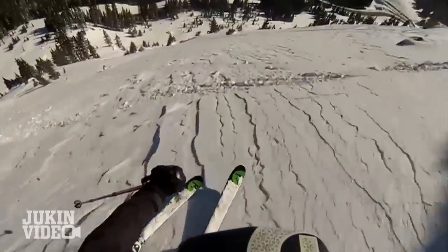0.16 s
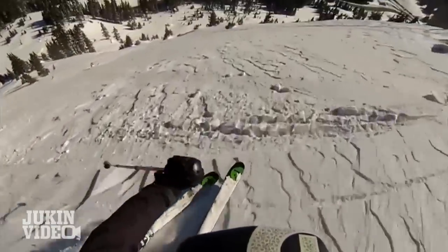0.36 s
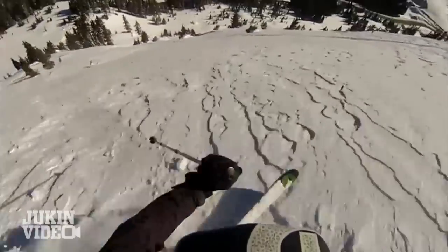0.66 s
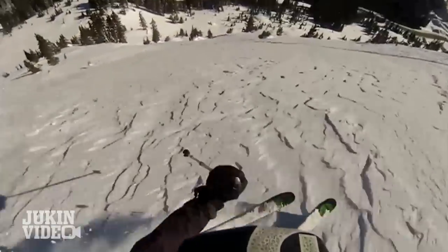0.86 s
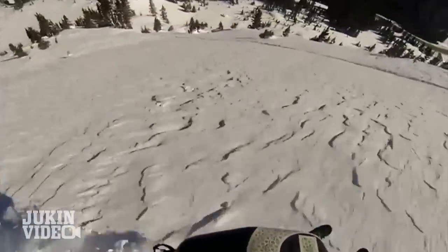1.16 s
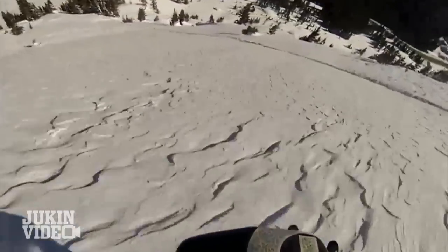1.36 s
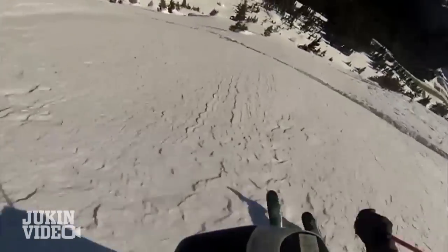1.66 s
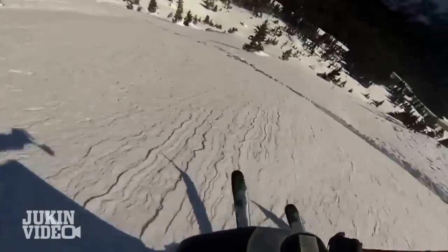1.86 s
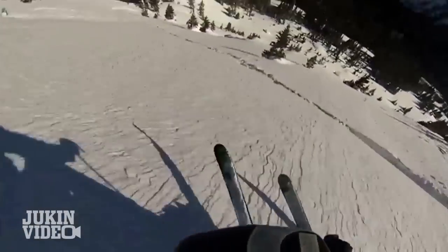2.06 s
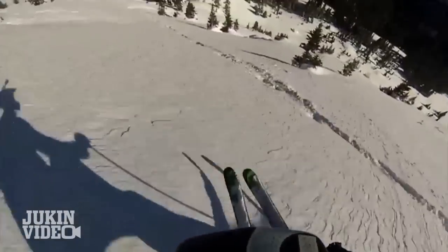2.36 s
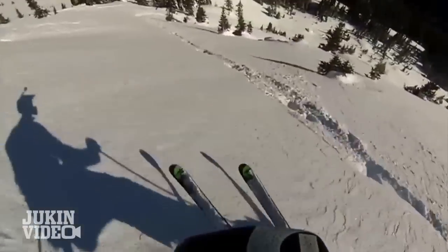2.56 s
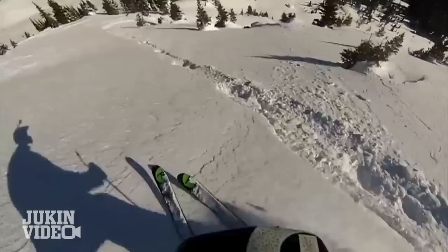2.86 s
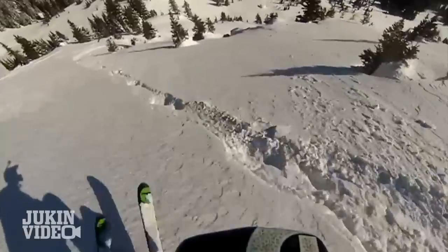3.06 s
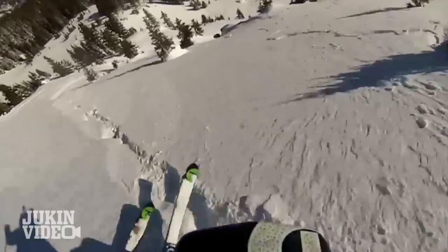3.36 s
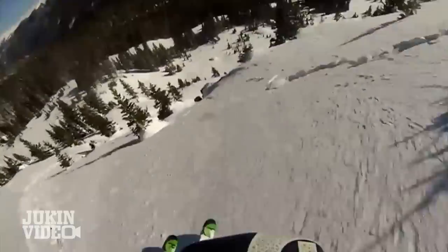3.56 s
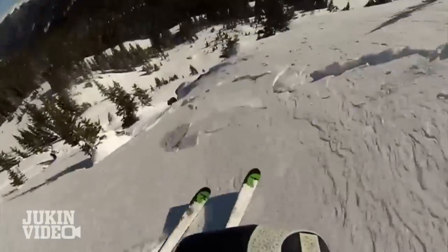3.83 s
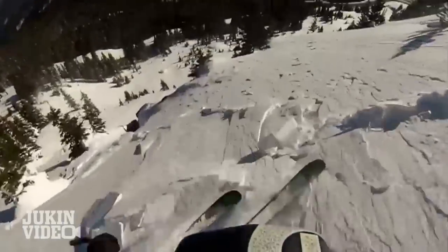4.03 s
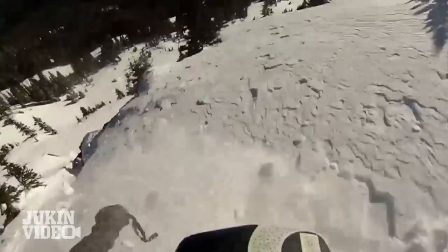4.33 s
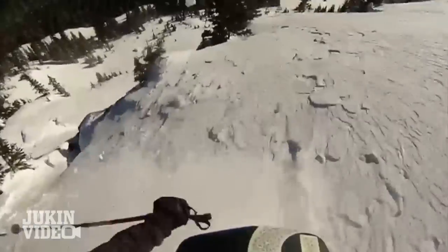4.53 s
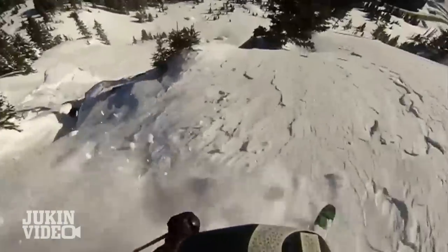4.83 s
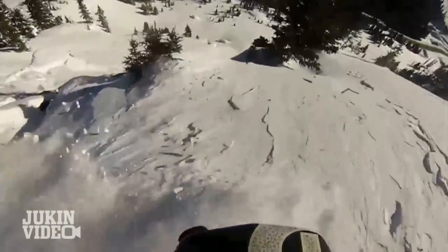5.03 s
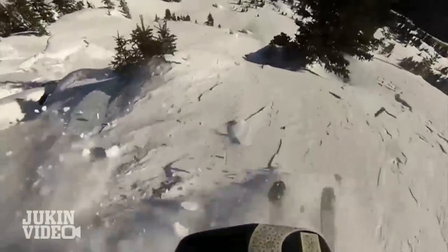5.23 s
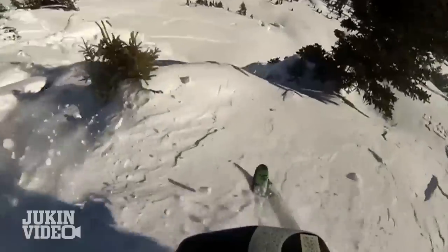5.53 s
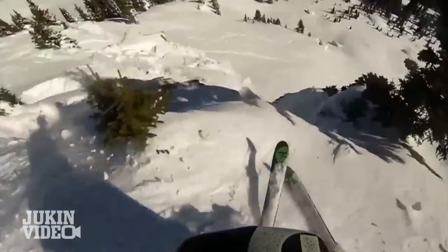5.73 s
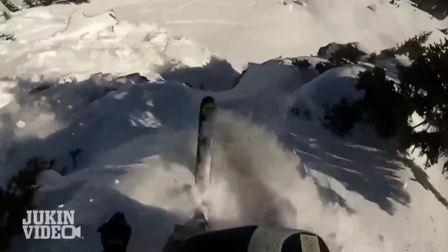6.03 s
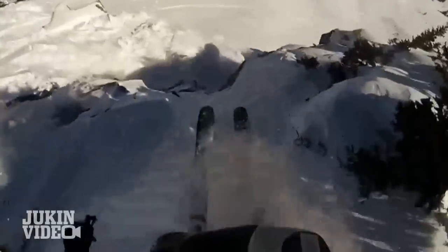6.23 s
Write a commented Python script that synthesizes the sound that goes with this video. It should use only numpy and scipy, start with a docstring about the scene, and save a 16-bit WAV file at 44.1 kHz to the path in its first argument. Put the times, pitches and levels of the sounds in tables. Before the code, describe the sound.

Skis scrape over hard snow under buffeting wind, until the rumble swells and crackles and the skis clack loudly against snow blocks.

```python
"""Skis hiss over wind-packed snow while rushing air rumbles and drones right at the microphone.
It rides a fast run in a closed case on the skier's helmet, a body's height above the skis.
Air buffets the case and keeps its mount ringing; bumps jolt it. Then the slab breaks up: the rumble
swells and crackles, and the skis knock on blocks of snow and on each other."""
import sys
import numpy as np
from scipy import signal
from scipy.fft import rfft, irfft, next_fast_len
from scipy.io import wavfile
from scipy.ndimage import uniform_filter1d, minimum_filter1d

SR = 44100
rng = np.random.default_rng(int(sys.argv[2]) if len(sys.argv) > 2 else 0)


def master(y):
    """Save y as 16-bit WAV."""
    cut = np.clip(np.atleast_2d(y).T, -1, 1)
    pcm = np.round(cut * 32767)  # scale
    wavfile.write(sys.argv[1], SR, pcm.astype(np.int16))


N = 281799
TIME = np.arange(N) / SR
CRUISE_DB = -41.5   # air force and edge bite in an easy glide; the layers follow their swing around it

# force of the air on the helmet (time [s], level [dB])
AIR_FORCE = [(0, -47), (0.85, -41.5), (1.1, -48), (1.9, -42.0), (3.1, -46.5), (3.65, -36), (4.3, -34.5),
             (4.55, -45.5), (4.95, -47.5), (5.42, -50.5), (5.72, -35.5), (5.88, -54.5), (6.03, -37.5),
             (6.2, -53.4), (6.37, -46.5)]
# how hard the edges bite through the turns (time [s], level [dB])
EDGE_BITE = [(0, -35.8), (0.33, -34.5), (0.92, -39.7), (1.0, -41.5), (1.35, -43.5), (1.5, -40.5),
             (1.95, -40), (2.3, -43.5), (2.85, -42), (3.2, -45), (3.42, -41.5), (3.53, -53), (3.72, -43.5),
             (3.82, -51.5), (3.95, -44), (4.12, -41.5), (4.42, -56.5), (4.8, -50.0), (5.08, -56),
             (5.6, -58.5), (6.37, -51)]
# drone of the mount, right at the microphone (time [s], level [dB])
MOUNT_DRONE = [(0, -38.5), (.33, -28.5), (.48, -33), (.68, -31), (1.0, -38), (1.75, -34.5), (2.4, -39),
               (3.25, -43.5), (3.68, -35), (4.1, -36.5), (4.6, -42), (5.5, -48), (6.0, -39), (6.37, -45)]

# spectra as heard inside the case (frequency [Hz], relative level [dB])
HISS_SPECTRUM = [(300, 0), (1500, 1), (4000, 7), (7000, 5), (8300, 1.5), (10200, 0), (11200, 4),
                 (13000, -2.5), (15200, -4)]   # steady high hiss
BUFFET_SPECTRUM = [(5, 5.5), (13, 10.5), (20, 12.5), (27, 4.5), (35, -2), (45, -7.5), (80, -55)]   # large eddies
TURBULENCE_SPECTRUM = [(30, -43), (48, 3), (70, 4.5), (110, 0), (170, -12.5), (230, -16.5), (330, -37),
                       (500, -24), (1200, -84)]   # small eddies
CRACKLE_SPECTRUM = [(20, -13), (130, -11), (300, 1), (600, -2), (2000, -13.5), (5000, -18.5), (11000, -28),
                    (15000, -30)]   # small snaps
THUD_SPECTRUM = [(40, -7), (130, -1.5), (280, 6), (500, -15.5), (1000, -21), (2500, -20), (6000, -38),
                 (15000, -44.5)]   # a bump landing
CRUNCH_SPECTRUM = [(150, -29), (230, 7), (300, 8.5), (380, 2), (600, 3), (820, 6), (1050, 2), (1400, -54),
                   (2500, -52)]   # crust under the bases
SCRAPE_SPECTRUM = [(700, -26.5), (1080, -12), (1220, -4.5), (1380, 1), (1620, -5.5), (1900, -4.5),
                   (2300, -6), (2650, -14.5), (3000, -17.5), (3270, -27.5), (3650, -27.5), (5000, -33)]   # edges on the crust
SPRAY_SPECTRUM = [(2200, -17), (3050, 6), (3250, 14), (3450, 6.5), (3800, 2.5), (4200, 4), (4310, 11),
                  (4420, 2.5), (5000, 1.5), (5600, -4.5), (6800, -5.5), (8200, -14), (11000, -17.5),
                  (15000, -29)]   # thrown powder
# stereo width of the hiss (frequency [Hz], side to mid [dB])
HISS_WIDTH = [(2000, -60), (3300, -21), (5000, -22.5), (8000, -8.5), (12000, -11)]

# resonances (frequency [Hz], width [Hz], relative gain [dB])
MOUNT_MODES = [(147, 5.2, 6), (284, 18.7, -17), (457, 6.7, -22), (691, 5.9, -34.5), (831, 22, -31.5),
               (880, 14, -33)]   # the mount: its drone first, then the overtones
SHELL_MODES = [(277, 28.5, 11.5), (470, 71, 0.5), (687, 23, 1.5), (764, 66, 5.5), (825, 210, 5.5),
               (1393, 81, -14)]   # the hollow helmet shell
KNOCK_MODES = [(750, 37, -35), (1170, 170, -1.5), (1968, 227, 8), (2180, 150, -8), (2760, 180, -8.5),
               (3110, 1270, -5.5), (4500, 290, -3.5), (5770, 126, -28), (6300, 420, -13),
               (8630, 910, -25.5), (9100, 300, -42), (9300, 470, -39), (11700, 3600, -35)]   # broad ones that every knock passes through
# thin ring of edges and poles (frequency [Hz], level re the knock [dB], t60 [s])
METAL_MODES = [(1206, -63, .3), (2420, -29, 0.1), (3100, -43, 0.27), (3720, -45, 0.2)]

# sharp little ticks (time [s], peak [dB], decay [s])
DRY_TICKS = [(3.432, -30, 0.0026), (3.6038, -43, 0.00098), (4.11, -38, 0.0057), (4.13, -37, 0.0026),
             (4.273, -38.5, 0.0028), (4.315, -27.5, 0.00175), (5.6395, -36, 0.0018), (5.7465, -30, 0.00064),
             (6.0552, -35.5, 0.003)]
# bumps that shake the helmet
# (time [s], push [dB], swing time [s], kick to the mount [dB], thud [dB], dip afterwards [dB])
BUMPS = [(0.93, -15.5, 0.0062, -28, -39, 4), (2.2, -11, 0.0056, -27, -43, 8.5),
         (3.345, -16, 0.0095, -28, -45, 2), (3.4441, -15, 0.0011, -27, -22, 15.5),
         (3.593, -15.5, 0.0076, -24.5, -36.5, 6), (3.736, -12.5, 0.0054, -33, -33.5, -0.5),
         (4.12, -17.5, 0.012, -22.5, -36, 6), (4.342, -14, 0.0047, -24, -32, 3),
         (5.756, -13.5, 0.0081, -21.5, -37.5, 10.5), (6.046, -15.5, 0.015, -33, -46, 6)]
# knocks of the skis (time [s], level over 10 ms [dB], contact [s], crumbling tail re contact [dB],
# low edge [Hz], high edge [Hz], pitch of the struck spot [Hz], its gain [dB], thud over 10 ms [dB])
SKI_KNOCKS = [(2.2031, -36.5, 0.0013, -15, 1790, 6660, 5700, -12, -67),
              (3.8626, -19.5, 0.0039, -9.5, 900, 4100, 1760, 14, -22.5),
              (3.868, -37, 0.002, -9, 706, 2430, 860, 13, -40.5),
              (4.2957, -46, 0.0051, -14, 500, 1800, 1050, 3, -32),
              (4.3103, -32, 0.0093, 3, 700, 2200, 1350, 18, -35.5),
              (4.3347, -10, 0.00426, -31, 990, 12500, 2610, -1, -23.5),
              (4.576, -41.5, 0.0054, 7, 1400, 2840, 2900, 7, -73),
              (4.6827, -49, 0.0037, -16, 1200, 2200, 1460, 18, -67),
              (4.9490, -26, 0.0077, -0.5, 1500, 5040, 1780, 18, -44),
              (5.598, -25, 0.0038, 10, 1180, 2690, 1450, 9, -40),
              (5.601, -49, 0.0019, -11, 4500, 7000, 4630, 9, -62),
              (5.625, -44, .008, 1, 1500, 3000, 2090, -4, -51),
              (5.8448, -40, 0.0065, 1, 1190, 2330, 2000, -25, -61)]


def from_db(db):
    """Decibels to gain."""
    return 10 ** (np.asarray(db) / 20)


def rms_one(x):
    """Scale to an rms of 1."""
    return x / np.sqrt(np.mean(x ** 2) + 1e-20)


def burst(x, db):
    """Scale a short sound to the energy of 10 ms at this level."""
    return from_db(db) * x / np.sqrt(np.sum(x ** 2) / (SR / 100))


def in_time(curve):
    """A curve's value at every sample."""
    return np.interp(TIME, *np.transpose(curve))


def swing(curve):
    """A control in dB above an easy glide."""
    return in_time(curve) - CRUISE_DB


def drift(rate_hz):
    """A random wander between points with a spread of 1."""
    knots = rng.standard_normal(4000)
    return np.interp(TIME * rate_hz, np.arange(len(knots)), knots)


def coloured(x, spectrum):
    """Give a steady sound a spectrum; past the last point it falls away steeply."""
    hz, db = np.transpose(spectrum)
    size = next_fast_len(N)
    bins = np.maximum(np.fft.rfftfreq(size, 1 / SR), 1)
    gain = from_db(np.interp(np.log(bins), np.log(hz), db))
    skirt = np.minimum(hz[-1] / bins, 1) ** 4
    return irfft(rfft(x, size) * skirt * gain, size)[:N]


def noise(spectrum):
    """Smooth noise with this spectrum."""
    return coloured(rng.standard_normal(N), spectrum)


def grains(spectrum, per_s, spread_db):
    """Random snaps, as of snow crystals, a few large among many small; rms 1."""
    sizes = from_db(spread_db * np.minimum(rng.exponential(1, N), 4))
    signs = rng.choice([-1, 1], N)
    snapping = rng.random(N) < per_s / SR
    return rms_one(coloured(sizes * signs * snapping, spectrum))


def evened(x, span_s):
    """Hold the rms of a noise near 1 over spans of this length."""
    power = np.abs(signal.hilbert(x, next_fast_len(N))[:N]) ** 2 / 2
    return x / np.sqrt(uniform_filter1d(power, max(int(span_s * SR), 1)) + 1e-20)


def resonate(x, modes):
    """Parallel resonances with alternating signs."""
    out = 0
    for k, (hz, width, db) in enumerate(modes):
        r = np.exp(-np.pi * width / SR)
        poles = [1, -2 * r * np.cos(2 * np.pi * hz / SR), r * r]
        gain = (-1) ** k * from_db(db) * (1 - r * r) / 2
        out = out + gain * signal.lfilter([1, 0, -1], poles, x + 1e-18)
    return out


def band(x, low_hz, high_hz, order=2):
    """Causal band-pass, at least an octave wide."""
    edges = [min(low_hz, high_hz / 2), high_hz]
    return signal.sosfilt(signal.butter(order, edges, "band", fs=SR, output="sos"), x)


def ring(hz, t60):
    """A struck mode dying away."""
    t = TIME[:SR // 2]
    return np.sin(2 * np.pi * hz * t) * from_db(-60 * t / t60)


def add(track, s, sound):
    """Mix a sound into a track at a time."""
    start = max(round(s * SR), 0)
    track[start:start + len(sound)] += sound[:N - start]


def hiss(level_db=-68.5):
    """Smooth high hiss behind everything."""
    return rms_one(noise(HISS_SPECTRUM)) * from_db(level_db)


def crackle(level_db=-58.5, onset_db=2, hold_s=0.13):
    """Small irregular snaps last while the wind is above a threshold and briefly after each bump."""
    shaken = swing(AIR_FORCE) > onset_db
    for s, *_ in BUMPS:
        shaken |= (TIME > s) & (TIME < s + hold_s)
    return grains(CRACKLE_SPECTRUM, per_s=280, spread_db=7.0) * from_db(level_db) * shaken


def ticks():
    """Dry ticks with almost no ring."""
    out, t = np.zeros(N), TIME[:SR // 20]
    for s, peak_db, decay_s in DRY_TICKS:
        snap = rng.standard_normal(len(t)) * np.exp(-t / decay_s)
        tick = band(snap, low_hz=253, high_hz=1680, order=1)
        add(out, s, from_db(peak_db) * tick / np.abs(tick).max())
    return out


def wind(buffet_db=-20.0, turbulence_db=-42):
    """Right at the microphone, large eddies rock the case and small ones rumble on it."""
    air, gusts = swing(AIR_FORCE), drift(rate_hz=14)
    buffet = evened(noise(BUFFET_SPECTRUM), span_s=0.11)
    buffet *= from_db(buffet_db + 0.63 * air + 1.73 * gusts)
    turbulence = evened(noise(TURBULENCE_SPECTRUM), span_s=0.051)
    turbulence *= from_db(turbulence_db + air + 2.2 * gusts)
    return buffet + turbulence


def mount(overtones_db=-50):
    """Shaking keeps the mount under the case droning; its overtones follow both skis and air."""
    shaking = band(rng.standard_normal(N), low_hz=96.7, high_hz=900)
    drone = band(resonate(shaking, MOUNT_MODES[:1]), low_hz=91.85, high_hz=183.7)
    drone = evened(drone, span_s=0.15) * from_db(in_time(MOUNT_DRONE) + 2.3 * drift(rate_hz=14))
    overtones = rms_one(resonate(shaking, MOUNT_MODES[1:]))
    overtones *= from_db(overtones_db + 0.67 * swing(EDGE_BITE) + 0.21 * swing(AIR_FORCE))
    return drone + overtones


def jolts():
    """A bump swings the pressure at the microphone down, then up, and kicks the mount."""
    out, t = np.zeros(N), TIME[:SR // 5] - 0.1
    for s, push_db, swing_s, kick_db, *_ in BUMPS:
        push = t / swing_s * np.exp(1 - np.abs(t / swing_s))
        add(out, s + t[0], from_db(push_db) * push)
        add(out, s, from_db(kick_db) * ring(MOUNT_MODES[0][0], t60=0.26))
    return out


def thuds(length_s=0.0053):
    """Each bump lands with a short, rough, low thud."""
    level = sum(from_db(db) * np.exp(-((TIME - s) / length_s) ** 2) for s, *_, db, _ in BUMPS)
    return level * evened(noise(THUD_SPECTRUM), span_s=0.01)


def dips(attack_s=0.024, recovery_s=0.05):
    """The level sinks briefly after a bump and recovers, as a gain."""
    db = 0
    for s, *_, dip_db in BUMPS:
        after = np.maximum(TIME - s, 0)
        sinking = np.minimum(after / attack_s, 1)
        recovering = np.exp(-np.maximum(after - attack_s, 0) / recovery_s)
        db = db - dip_db * sinking * recovering
    return from_db(db)


def digging(length_s=0.014):
    """The short surge of pressure under the skis at every bump, as a gain."""
    return sum(from_db(push_db) * np.exp(-((TIME - s) / length_s) ** 2) for s, push_db, *_ in BUMPS)


def skis(crunch_db=-50.5, scrape_db=-41.5, spray_db=-55.0, dig_db=-35):
    """A body's height below the microphone, bases crush the crust; edges scrape it and throw powder."""
    edging, air = swing(EDGE_BITE), swing(AIR_FORCE)
    chatter = drift(rate_hz=61)   # all three layers shudder together
    # harder edging and more speed both raise the crunch and the spray; a bump adds a burst of crunch
    glide_level = from_db(crunch_db + 0.89 * edging + 0.08 * air + 0.92 * chatter)
    crunch_level = np.hypot(glide_level, from_db(dig_db) * digging())
    scrape_level = from_db(scrape_db + edging + 1.17 * chatter)
    spray_level = from_db(spray_db + 1.36 * edging + 0.45 * air + 1.5 * chatter)
    crunch = grains(CRUNCH_SPECTRUM, per_s=2500, spread_db=3.0) * crunch_level
    scrape = grains(SCRAPE_SPECTRUM, per_s=9000, spread_db=0.5) * scrape_level
    spray = rms_one(noise(SPRAY_SPECTRUM)) * spray_level
    return crunch + scrape + spray


def crush(force, passes=5):
    """Gritty contact under a force curve, its energy spread evenly over all frequencies."""
    grit = force * rng.standard_normal(len(force))
    for _ in range(passes):
        flat_spectrum = np.exp(1j * np.angle(rfft(grit)))
        grit = force * irfft(flat_spectrum, len(force))
    return grit


def knocks(crumble_s=0.0083, spot_width_hz=130, notch_hz=4050, notch_width_hz=1700, kick_db=5):
    """A ski hits and grinds, snow crumbles away; the helmet shell thuds, metal and mount ring on."""
    out, t = np.zeros(N), TIME[:SR // 10]
    # the case passes little in the band between its wall resonances
    case_notch = signal.iirnotch(notch_hz, notch_hz / notch_width_hz, fs=SR)
    for s, level_db, contact_s, tail_db, low_hz, high_hz, spot_hz, spot_db, thud_db in SKI_KNOCKS:
        contact = crush(np.exp(-(t / contact_s) ** 4))
        tail_level = contact[:round(contact_s * SR)].std() * from_db(tail_db)
        crumbs = tail_level * np.exp(-t / crumble_s) * rng.standard_normal(len(t))
        force = signal.lfilter(*case_notch, contact + crumbs)
        struck_spot = resonate(force, [(spot_hz, spot_width_hz, spot_db)])
        crack = band(resonate(force, KNOCK_MODES) + struck_spot, low_hz, high_hz)
        thud = band(resonate(force, SHELL_MODES), low_hz=194, high_hz=1500)
        add(out, s, burst(crack, level_db) + burst(thud, thud_db))
        add(out, s, sum(from_db(level_db + db) * ring(hz, t60) for hz, db, t60 in METAL_MODES))
        add(out, s, from_db(thud_db + kick_db) * ring(MOUNT_MODES[0][0], t60=0.41))
    return out


def scene(thud_side_db=-8):
    """Inside the case it is nearly mono; only thuds, crackle and high hiss have stereo width."""
    dip = dips()
    mid = dip * (skis() + hiss() + wind() + mount()) + jolts() + thuds() + knocks() + ticks()
    side = dip * coloured(hiss(), HISS_WIDTH) + from_db(thud_side_db) * thuds()
    return np.array([mid + side + crackle(), mid - side + crackle()])


def record(dry, ceiling_db=3.5, release_db_per_s=90, overload=0.88, cutoff_hz=16100):
    """The loudest crack overloads the input; a fast limiter briefly ducks the rest; the top is cut."""
    peak_db = 20 * np.log10(np.abs(dry).max(axis=0) + 1e-9)
    over_db = np.maximum(peak_db - ceiling_db, 0)
    release_db = release_db_per_s * TIME
    held_db = np.maximum.accumulate(over_db + release_db) - release_db
    gain_db = uniform_filter1d(minimum_filter1d(-held_db, size=41), size=41)
    flattened = np.clip(dry * from_db(gain_db), -overload, overload)
    return signal.sosfilt(signal.cheby2(16, 70, cutoff_hz, fs=SR, output="sos"), flattened)


dry = scene()
out = record(dry)
master(out)
```